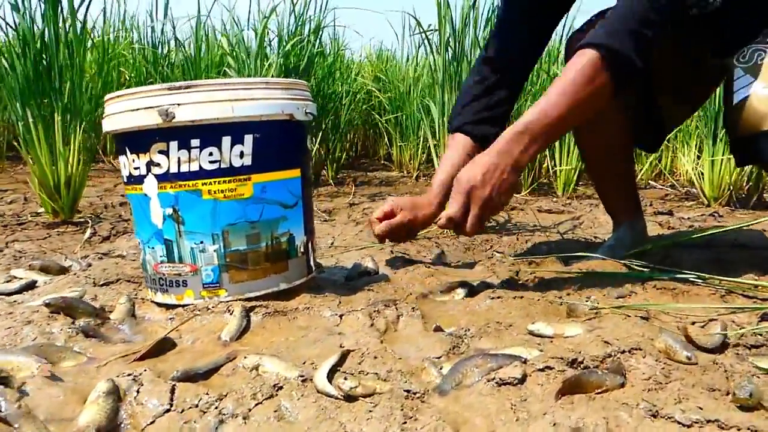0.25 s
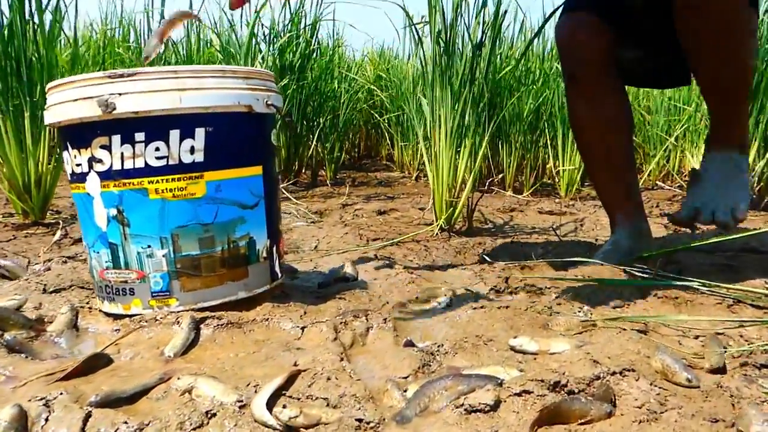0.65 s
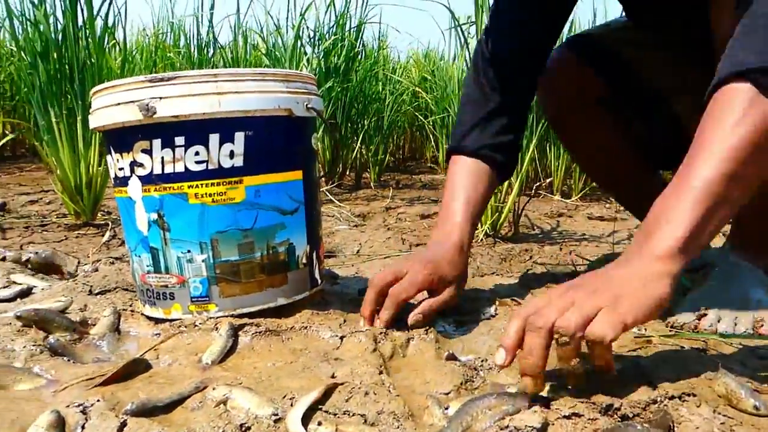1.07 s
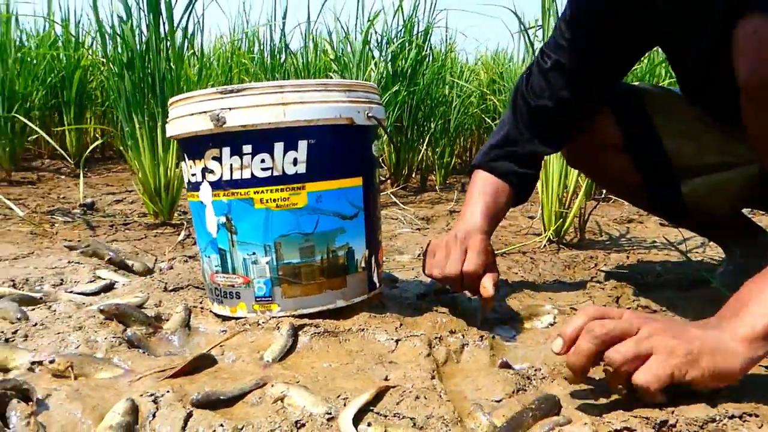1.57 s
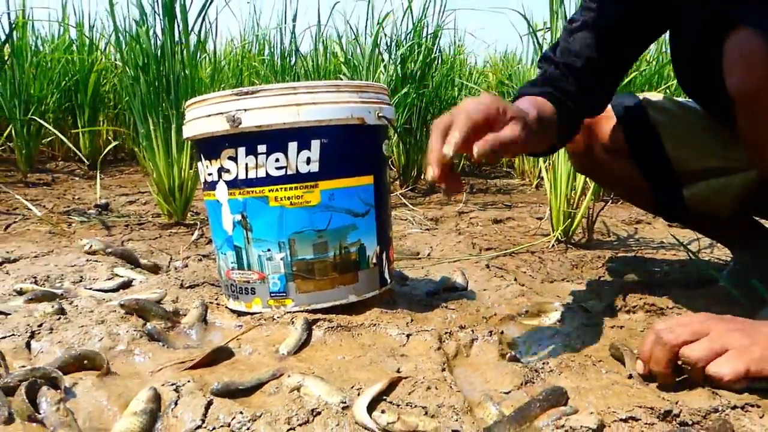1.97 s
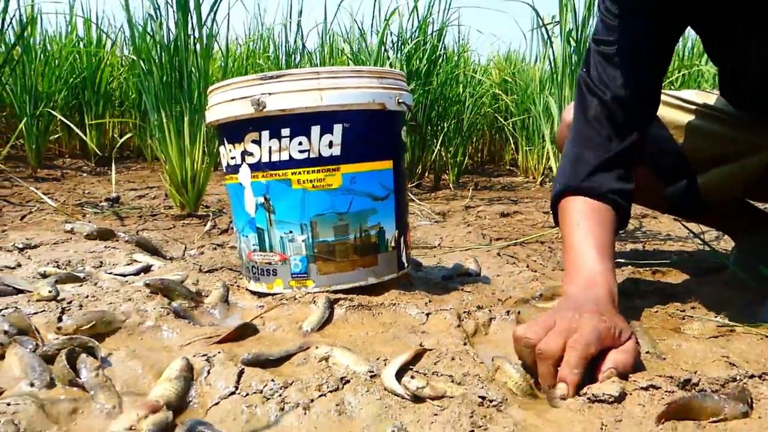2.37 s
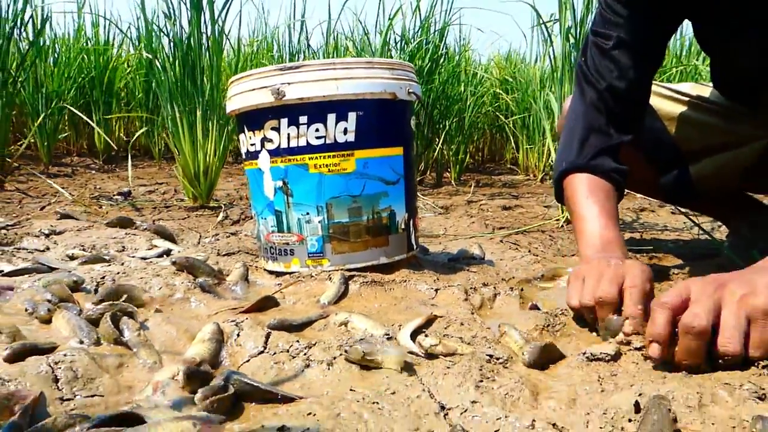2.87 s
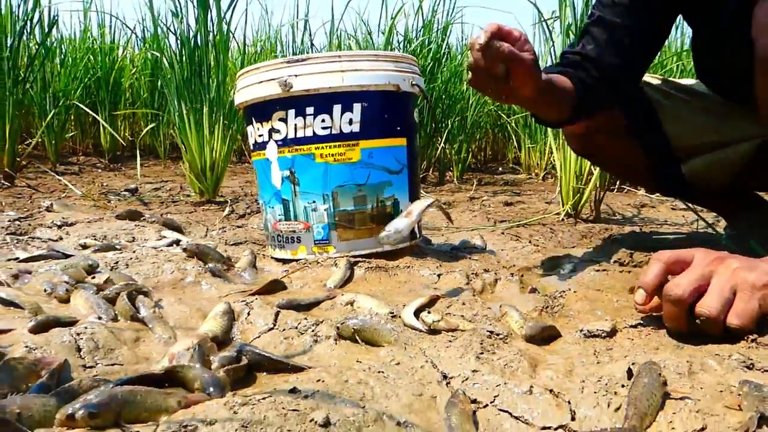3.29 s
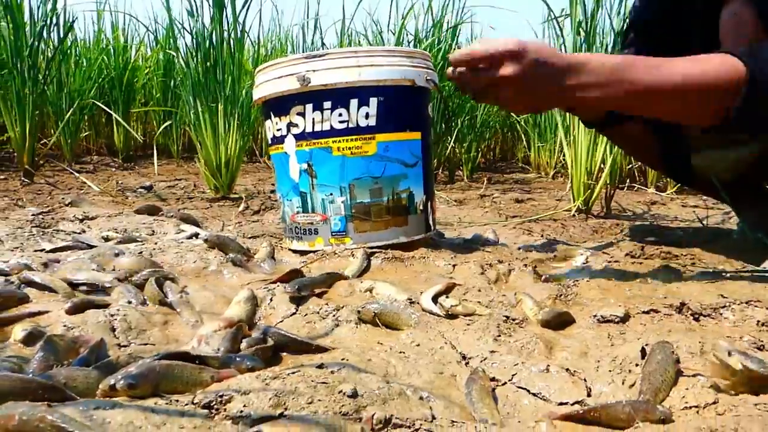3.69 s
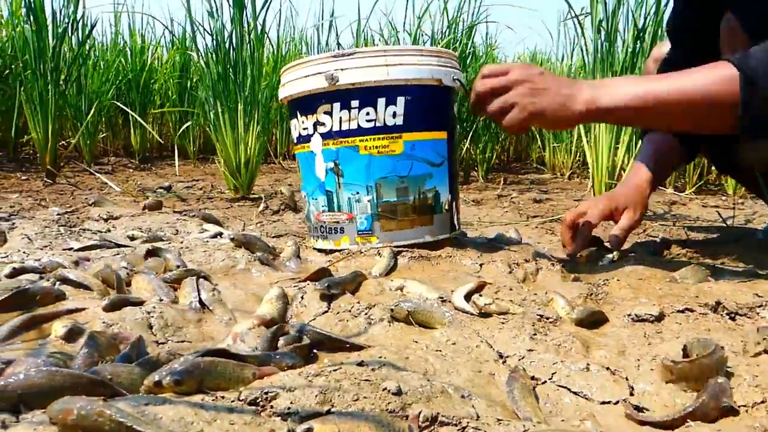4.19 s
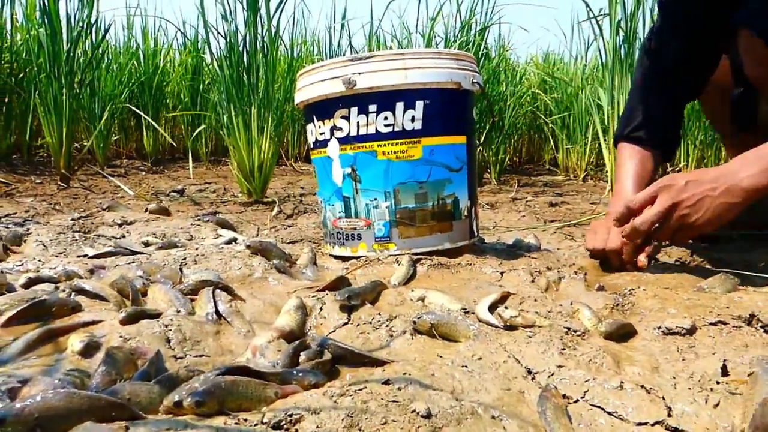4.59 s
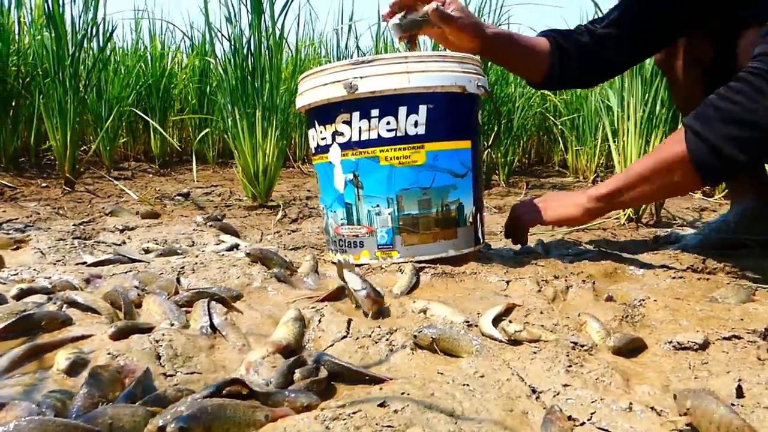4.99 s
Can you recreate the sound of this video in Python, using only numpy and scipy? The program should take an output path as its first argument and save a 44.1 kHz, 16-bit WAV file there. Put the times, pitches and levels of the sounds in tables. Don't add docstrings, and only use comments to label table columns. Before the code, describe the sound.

Dull hollow knocks on a plastic pail, irregular, mixed with sticky pops, spitting smacks and dead thuds on soft mud. It begins sparsely with ticks, bursts into a splashy flurry, calms, then knocks again. Two tiny high squeaks of slimy skin precede one heavy blow, followed by further thumps and a last wet squelching cluster. The sound is dry, close and stereo in open air, with soft leaf hush and a barely audible insect.

```python
import sys
import numpy as np
from scipy import signal
from scipy.io import wavfile
from scipy.ndimage import uniform_filter1d

SR = 44100
rng = np.random.default_rng(int(sys.argv[2]) if len(sys.argv) > 2 else 0)


def transcribe(signal):
    frames = np.atleast_2d(signal).T
    limited = np.clip(frames, -1, 1)
    pcm = np.round(limited * 32767).astype(np.int16)
    wavfile.write(sys.argv[1], SR, pcm)


def natural_amplitude(level_db):
    exponent = np.asarray(level_db, float) / 20
    return 10 ** exponent


N = 231294


def evened(x):
    return x / np.sqrt(np.mean(x ** 2) + 1e-20)


def read(points, hz):
    f, value = np.transpose(points)
    return np.interp(np.log(hz + 1), np.log(f + 1), value)


def add(mix, s, sound, pan_db):
    part = mix[:, max(round(s * SR), 0):][:, :sound.shape[-1]]
    part += natural_amplitude([[pan_db / 2], [-pan_db / 2]]) * sound[..., :part.shape[1]]


def band(x, lo_hz, hi_hz):
    edges = np.clip([lo_hz, hi_hz], 20, [0.4 * SR, 0.45 * SR])
    sos = signal.butter(2, edges, "bandpass", fs=SR, output="sos")
    return evened(signal.sosfilt(sos, x))


def swell(t, rise, fall, bend=0.96, soft=2):
    up = np.sin(np.pi / 2 * np.clip(t / rise, 0, 1)) ** soft
    return up * natural_amplitude(-7 * (np.maximum(t - rise, 0) / fall) ** bend)


def ground(x, t60, db, shared):
    t = np.arange(3000) / SR
    sparse = rng.random((2, len(t))) < 0.05
    taps = rng.standard_normal((2, len(t))) * sparse * natural_amplitude(-60 * t / t60) * (t > 0.001)
    taps = taps + shared * taps[::-1]
    return x + natural_amplitude(db) * signal.fftconvolve(x, taps / np.linalg.norm(taps[0]), axes=1)[:, :N]


# f/Hz, level/dB (per Hz)
HUSH = [(25, -26.5), (110, -6.5), (335, 0), (754, -7), (1890, -9), (8000, -20), (14500, -22.5),
        (16000, -44)]
# f/Hz, likeness (0 to 1)
SAME = [(60, 0.038), (400, 0.088), (2400, 0.63), (15000, 0.64)]


def hush():
    frames, hz = N // 256 + 5, np.fft.rfftfreq(1024, 1 / SR)
    a, b, c, d, patches = rng.standard_normal((frames, 513, 5)).T
    patches = uniform_filter1d(patches, size=20, axis=0)
    patches = evened(uniform_filter1d(patches, size=6, axis=1))
    flicker = uniform_filter1d(rng.standard_normal(N), size=500)
    flicker = evened(uniform_filter1d(flicker, size=300))
    same, left = np.clip(read(SAME, hz), 0, 1)[:, None], a + 1j * b
    right = same * left + np.sqrt(1 - same ** 2) * (c + 1j * d)
    z = np.array([left, right]) * natural_amplitude(read(HUSH, hz)[:, None] + 2.93 * patches)
    air = signal.istft(z, nperseg=1024, noverlap=768)[1][:, :N]
    return natural_amplitude(-47.5) * evened(air * natural_amplitude(2.0 * flicker))


# t/s, length/s
RASPS = [
    (0.547, 0.178),
    (1.399, 0.26),
]


def insect():
    out = np.zeros((2, N))
    for s, length in RASPS:
        rasp = band(rng.standard_normal(SR)[:round(length * SR)], 2880, 3000)
        add(out, s, natural_amplitude(-55.5) * rasp * np.hanning(len(rasp)) ** 0.45, 1.5)
    return out


def grains(lo_hz, hi_hz, per_s, spread_db, cycles, tilt, pan_db, count):
    clumps = evened(uniform_filter1d(rng.standard_normal(N), size=400))
    clumps = natural_amplitude(spread_db * np.minimum(clumps, 1.6))
    size = natural_amplitude(spread_db * np.minimum(rng.exponential(1, N), 2.4))
    size = size * (rng.random(N) < per_s / SR) * clumps
    kind, out = rng.integers(0, count, N), np.zeros((2, N))
    for k, hz in enumerate(np.geomspace(lo_hz, hi_hz, count)):
        u = np.arange(1500) * hz / SR
        ring = np.sin(2 * np.pi * u) * u ** 2 * np.exp(-u / cycles)
        ring = ring / np.linalg.norm(ring) * hz ** -tilt
        add(out, 0, signal.oaconvolve(size * (kind == k), ring), pan_db * rng.standard_normal())
    return evened(out)


# t/s, level/dB
BUSY = [(0, -56.5), (.5, -56.5), (.7, -70), (.95, -41.5), (1.15, -53.5), (1.35, -61), (2.3, -47.5),
        (2.8, -56), (3.3, -44.5), (3.5, -56), (3.9, -55.5), (4.4, -47.5), (4.65, -56.5), (5.24, -54.5)]
# t/s, level/dB
SLOSH = [(0, -60.5), (.73, -72), (.76, -43), (.83, -47), (.89, -48), (.93, -54), (1.03, -54), (1.1, -59.5),
         (3.6, -56.5), (3.68, -56.5), (3.8, -64), (5.24, -69)]


def stirring():
    t = np.arange(N) / SR
    busy_db = np.interp(t, *np.transpose(BUSY))
    slosh_db = np.interp(t, *np.transpose(SLOSH))
    crackle_db = -51 + 0.38 * (busy_db + 55.5)
    crackle = natural_amplitude(crackle_db) * grains(1000.0, 7040, 1500, 4.36, 0.8, 0.2, 13.8, count=20)
    low = natural_amplitude(busy_db + 1.0) * grains(201.4, 688.0, 330, 1.73, 1.03, 0.16, 11.4, count=10)
    slosh = natural_amplitude(slosh_db) * grains(3650, 14400, 7000, 3.6, 0.54, 0.16, 10.0, count=12)
    fizz = natural_amplitude(-62.5) * grains(4300, 14000, 700, 5.1, 0.41, 0.06, 8.2, count=8)
    return crackle + low + slosh + fizz


# t/s (of peak), level/dB, f/Hz, fall/ms (to lose 7 dB)
MUD_THUDS = [(.9, -30, 300, 8), (.928, -32, 300, 5), (1.99, -33, 110, 14), (2.128, -36, 300, 6),
             (2.381, -32, 300, 7), (2.539, -35, 560, 6), (2.633, -34, 300, 9), (2.844, -32, 345, 6),
             (2.973, -33, 290, 3), (2.9905, -17, 540, 2), (3.006, -32, 370, 3), (3.09, -32, 250, 6),
             (4.155, -32, 345, 6), (4.206, -35, 190, 8), (4.429, -33, 430, 7), (5.007, -33, 345, 6),
             (5.204, -33, 330, 8)]
# t/s (of peak), level/dB, f/Hz (of the air pocket)
MUD_POPS = [(.009, -30, 960), (.303, -33, 2400), (.3167, -23, 2750), (.82, -33, 5200), (.846, -30, 5370),
            (.852, -33, 4900), (.901, -28, 1930), (.965, -29, 2070), (.976, -29, 780), (.989, -33, 4100),
            (1.021, -32, 4200), (1.308, -31, 3720), (1.83, -29, 1790), (1.89, -30, 4410),
            (1.956, -32, 2620), (1.985, -28, 4270), (2.347, -31, 1930), (2.537, -31, 1930),
            (2.712, -30, 2070), (2.729, -26, 3860), (2.924, -32, 1930), (2.957, -27, 3860),
            (3.051, -27, 9100), (3.106, -30, 1930), (3.24, -21, 1240), (3.366, -25, 3170),
            (3.367, -26, 4000), (3.39, -28, 4550), (3.6, -31, 1200), (3.675, -30, 2340), (3.961, -31, 1515),
            (4.152, -31, 1550), (4.189, -31, 950), (4.432, -32, 1600), (4.549, -31, 2500),
            (4.737, -31, 1930), (4.737, -32, 1300), (4.751, -31, 1790), (5.1325, -24, 4200),
            (5.139, -26, 13500), (5.1655, -27, 3100)]


def mud():
    out, dead_db = np.zeros((2, N)), -22
    for row in MUD_THUDS:
        add(out, *knock(*row, dead_db, dead_db, rng.standard_normal(2200)), 1.0)
    for row in MUD_POPS:
        burst = smack(*row, 1.0, -18, rng.standard_normal((1400, 4)))
        add(out, *burst, 3.0 * rng.standard_normal())
    return ground(out, 0.025, -12, 0.3)


def squeak(rows):
    s, db, hz, build_ms = np.transpose(rows)
    t = np.arange(s[0] - build_ms[0] / 1000, s[-1] + 0.0061, 1 / SR)
    late_ms = 1000 * (t[:, None] - s)
    let_go_ms, depth_db = 2.38, 16
    slips_db = db - depth_db * np.maximum(-late_ms / build_ms, late_ms / let_go_ms)
    level_db, now = slips_db.max(axis=1), slips_db.argmax(axis=1)
    pitch = hz[now] * (1 - 0.04 * np.clip(late_ms[np.arange(len(t)), now], -3, 3))
    noise = rng.standard_normal(SR)[:len(t)]
    waver = 1 + 0.053 * evened(uniform_filter1d(noise, size=24))
    phase = 2 * np.pi * np.cumsum(pitch * waver) / SR
    tone = np.sin(phase) + 0.024 * np.sin(2 * phase) + 0.082 * np.sin(3 * phase)
    return t[0], natural_amplitude(level_db) * (tone + 0.13 * band(noise, 1000, 4600))


# t/s, level/dB, f/Hz, build-up/ms
SQUEAKS = [
    [(3.2195, -17.5, 2971, 1.1), (3.2233, -16, 2900, 1.6), (3.226, -24, 2910, 1.6), (3.231, -20, 3000, 3),
     (3.2325, -21, 2800, 1.5), (3.2363, -10.5, 3050, 1.02), (3.24, -17.5, 3140, 1.2),
     (3.2415, -23, 3000, 1.2)],
    [(3.413, -22, 3380, 0.77), (3.4156, -17.5, 3190, 1.1), (3.4175, -25, 3100, 2), (3.4205, -22, 3300, 3),
     (3.423, -21.5, 3150, 2.5), (3.4252, -20, 3300, 3), (3.428, -17, 3250, 4), (3.43, -22, 3100, 2),
     (3.4415, -28.5, 3305, 3.96)],
]


def squeaks():
    out = np.zeros((2, N))
    for rows in SQUEAKS:
        add(out, *squeak(rows), -3.0)
    return out


def smack(s, db, hz, fall_ms, spray_db, noise):
    t = np.arange(noise.shape[0]) / SR - 0.005
    fall = 0.93 * fall_ms / 1000
    rise = 0.0003 + 0.6 * fall
    clean = np.clip(1.2 - 0.451 * fall_ms, 0.15, 0.75)
    ring = np.sin(2 * np.pi * hz * t * (0.95 + 15 * t))
    pocket = clean * ring + 0.71 * (1 - clean) * band(noise[:, 0], 0.61 * hz, 1.41 * hz)
    drops = noise[:, 1] + 0.68 * noise[:, 2:].T
    spray = natural_amplitude(spray_db - 4.5) * band(drops, 3040, 12300) * swell(t + 0.0024, rise + 0.002, fall)
    snap = natural_amplitude(-10) * band(drops, 0.35 * hz, 1.7 * hz) * swell(t, rise, 0.00057)
    seep = 0.11 * min(fall_ms / 1.6, 1) ** 2 * swell(t + 0.0063, 0.005, 0.0091)
    burst = (swell(t, rise, fall) + seep) * pocket
    return s - rise - 0.005, natural_amplitude(db) * (burst + spray + snap)


# t/s, level/dB, f/Hz, left-right/dB
POPS = [(0.3163, -21, 2040, -4), (0.7796, -19.5, 910, 6), (0.7805, -25, 1510, 6), (0.799, -31, 3570, 7),
        (0.8622, -19.5, 1180, 1), (0.901, -31.5, 4300, 1.5), (1.2007, -31.5, 4010, 5),
        (1.8958, -27, 1668, 2.5), (2.229, -35, 4176, 3.5), (2.3052, -32, 1610, 3), (2.573, -20.5, 1730, -2),
        (2.6024, -24.5, 4490, -1.5), (2.8285, -30, 2230, 7.5), (2.894, -33.5, 1910, -7),
        (2.951, -31.5, 1920, 2.5), (2.9878, -28.5, 1657, 1.6), (3.09, -31.5, 1456, 1),
        (3.3659, -25, 7140, 1.5), (3.39, -34, 2013, -3), (3.8797, -34, 2180, 5.5), (4.1155, -10, 690, 1),
        (4.1178, -28, 1550, 1), (4.2595, -32, 1580, 3.5), (4.549, -31, 4000, 3), (4.6768, -30.5, 2600, -4),
        (5.0118, -32, 1900, 3), (5.1716, -22, 1210, 5)]
# t/s, level/dB, f/Hz, spray/dB, left-right/dB
SPLATS = [(0.2974, -28.5, 9410, -14, -4), (0.392, -35.5, 4680, -5, 2.5), (0.9485, -31, 1260, -1, -5),
          (1.6695, -29, 4130, -11.5, 4), (1.7351, -33, 1680, -1, -2), (1.889, -28.5, 1724, -10, 1),
          (1.9819, -30, 9800, 7.5, -2), (1.9873, -26, 1330, -4, 4.5), (2.163, -31.5, 3800, -10, 1.35),
          (2.537, -29, 4630, -4.5, -3), (2.639, -23, 4460, -5, -1.5), (2.7241, -27, 2190, -1.5, 0),
          (2.7294, -27.5, 2210, -4, -3), (2.8773, -28.5, 9630, -2.5, -4), (3.0507, -22.5, 7070, -7, -3),
          (3.181, -30.5, 5590, -10.5, 1.34), (3.1964, -27.5, 1466, -8, -5), (3.378, -27, 4090, -13, 1),
          (3.434, -24, 3300, -13, -1), (3.4338, -26.5, 1600, -12, -2), (3.5548, -33, 5520, 1, 2),
          (4.802, -33, 3940, -7, 0.5), (5.0386, -27.5, 2560, -11, -6), (5.133, -27, 1800, -4, -0.34)]
# t/s, level/dB, f/Hz, fall/ms (to lose 7 dB), spray/dB
SQUELCHES = [(0.7858, -33, 1697, 7, -9), (0.8098, -36, 1207, 7, -9), (0.945, -37, 4330, 3, -6),
             (0.9744, -30, 1192, 4, -21), (1.8536, -33, 1710, 4, -15.5), (2.773, -34.5, 4250, 3.5, -2.5),
             (2.955, -32, 3860, 4, -11.5), (3.4394, -29.5, 11000, 3.5, -5), (3.684, -41.5, 13773, 7, 2),
             (3.826, -38, 6100, 3.5, -7), (4.1024, -31, 1530, 12, -3.5), (4.5191, -33, 2284, 3, -10),
             (5.1363, -20, 2130, 4, -10.5), (5.15, -26.5, 1250, 5.5, -27.5), (5.1616, -23, 1216, 3, -13),
             (5.1652, -27, 2000, 6, -19)]
# t/s, level/dB, f/Hz
TICKS = [(0.2773, -40, 3640), (0.499, -25.5, 1590), (0.533, -32.5, 1555), (1.237, -28.5, 3070),
         (1.26, -30.5, 1667), (1.3606, -30.5, 3200), (1.6484, -33, 3970), (2.1277, -28, 1790),
         (2.333, -28, 1800), (2.475, -27.5, 2360), (2.6186, -28, 3740), (2.7087, -35, 4520),
         (.012, -27.5, 1800), (.095, -36, 1600), (.115, -33, 1900), (.178, -32, 1900), (.44, -33, 1900),
         (.588, -31.5, 1500), (.882, -29, 2600), (1.472, -34, 1150), (1.487, -32, 1200), (1.51, -35, 1200),
         (1.532, -31, 750), (1.562, -30.5, 1900), (1.568, -34, 2100), (1.651, -32, 1900),
         (1.744, -32, 1600), (2.29, -25, 890), (4.387, -26, 840), (4.7515, -26.5, 740), (4.275, -33, 1650),
         (4.312, -34, 1500), (4.388, -29, 1650), (5.075, -37, 3180), (5.108, -32, 2420),
         (5.2095, -32, 1964)]
# t/s, level/dB, f/Hz
SPECKS = [(0.1744, -40, 4600), (0.427, -35, 5300), (0.4442, -34, 9180), (0.464, -32.5, 5530),
          (0.5821, -36, 4080), (0.6, -32, 3730), (0.6594, -42, 4250), (0.7377, -39, 7100),
          (0.7572, -36, 5610), (0.8686, -32, 9850), (1.1373, -31.5, 7300), (1.7199, -34, 3900),
          (2.0203, -30, 6800), (2.1425, -30.5, 3980), (2.464, -31, 5000), (2.7602, -26, 4360),
          (2.9123, -37, 8600), (3.0041, -30, 3500), (3.476, -35, 5610), (4.0472, -32, 4040),
          (4.3997, -31.5, 9000), (4.4218, -31, 5880), (4.6029, -38, 10100), (5.0962, -34, 5330),
          (5.1047, -34, 3790), (5.1387, -21, 4460), (5.16, -31, 9000), (5.1714, -33, 4450),
          (5.1826, -33, 5330), (5.1954, -35, 5010)]


def smacks():
    rows = [(s, db + 2.0, hz, 1.1, -19.5, pan_db) for s, db, hz, pan_db in POPS]
    for s, db, hz, spray_db, pan_db in SPLATS:
        fall_ms = 0.76 if hz > 6200 else 2.066
        rows.append((s, db, hz, fall_ms, spray_db, pan_db))
    rows += [(*row, 0.7) for row in SQUELCHES]
    rows += [(s + 0.00101, db - 2.0, hz, 1.2, -19, 2.2) for s, db, hz in TICKS]
    rows += [(s + 0.001, db - 2.5, hz, 0.7, -9, 0.6) for s, db, hz in SPECKS]
    out = np.zeros((2, N))
    for row in rows:
        add(out, *smack(*row[:-1], rng.standard_normal((1400, 4))), row[-1])
    return out


def knock(s, db, hz, fall_ms, bottom_db, rim_db, noise):
    t = np.arange(len(noise)) / SR
    rise, fall = 0.004, 0.9 * fall_ms / 1000
    ripple = 0.0023 * np.clip((db + 38) / 24, 0.2, 1) * (1 - np.exp(-t / 0.0012))
    wall = np.sin(2 * np.pi * hz * (t * (1 - 2.6 * t) + ripple)) * swell(t, rise, fall, 1.43, 1.4)
    bottom = natural_amplitude(bottom_db - 3.0) * np.sin(2 * np.pi * 178 * t) * swell(t, 0.0064, 0.0087)
    belly = natural_amplitude(min(bottom_db, -9) - 0.5) * np.sin(2 * np.pi * 212 * t) * swell(t, 0.0085, 0.007, 1.4)
    direct = np.clip(0.86 + rim_db / 8.3, 0, 1)
    turns = 578 * (t + 0.00086 * (1 - np.exp(-t / 0.0011)))
    rim = natural_amplitude(rim_db - 2.5) * np.sin(2 * np.pi * turns)
    rim = rim * swell(t, 0.0018, 0.0025 + direct * 0.95 * fall, 1.15)
    slap = natural_amplitude(np.clip(rim_db, -14, 1) - 15) * band(noise, 460, 1586) * swell(t, 0.0024, 0.0028)
    push = natural_amplitude([[-39], [-49]]) * swell(t, 0.0027, 0.0091)
    return s - rise, natural_amplitude(db) * (0.86 * wall + bottom + belly + rim + slap + push)


# t/s (of peak), level/dB, f/Hz, fall/ms, rim/dB
RIM_BLOWS = [(0.7822, -27.5, 334, 0.5, 12.5), (0.789, -30, 441.5, 2.5, 7.5), (0.8102, -28, 322, 3, 8),
             (0.8177, -32, 320, 1, 3), (1.0541, -29.5, 312, 5.5, -2), (1.968, -31, 230, 2, -8),
             (1.9807, -30.5, 400, 5, 0.5), (1.9877, -19, 368, 6, 9.5), (2.0242, -28, 368, 6, 8),
             (2.155, -31.5, 348.3, 5, 0), (2.1667, -30.5, 300, 3, -0.5), (2.3084, -16.5, 340, 4, 0.5),
             (2.357, -32, 306, 5.5, -2), (3.213, -34, 400, 5, -3), (3.241, -28.5, 261, 2.5, -3),
             (4.067, -27, 397, 1, 1.5), (4.0727, -25.5, 402, 2, -3), (4.084, -28, 377, 5, -2),
             (4.1193, 0.5, 323.5, 3, -5), (5.135, -16.5, 330, 1.5, 6.5), (5.14, -22, 282, 8.5, 3),
             (5.1471, -35, 319, 8.5, 8), (5.153, -24.5, 425, 2, 3), (5.1615, -25.5, 352, 4.5, 4.5)]
# t/s (of peak), level/dB, f/Hz, fall/ms
WALL_BLOWS = [(0.856, -23, 315, 14), (0.8668, -11, 331, 4), (0.8837, -34, 307.5, 10),
              (0.9771, -20.5, 392, 4.5), (1.0376, -18.5, 290, 4.5), (1.4842, -31, 349.5, 1.2),
              (1.727, -30, 260.9, 14), (2.2558, -33, 315.5, 8.5), (2.2928, -12.5, 316, 14),
              (2.9945, -17, 350, 2.5), (3.2463, -27.5, 318.4, 2), (3.8061, -23, 300, 4),
              (3.8206, -25.5, 327, 1.5), (4.2613, -12.5, 296, 4.5), (4.2792, -25, 303, 6),
              (4.295, -23.5, 369, 1), (4.315, -19.5, 370, 2.5), (4.331, -31.5, 330, 6),
              (4.3906, -11.5, 292, 3), (4.5057, -31.5, 330, 9), (4.515, -27.5, 313.8, 10),
              (4.727, -29, 300.7, 11.5), (4.755, -10, 283, 6), (5.1752, -25.5, 340, 5.5),
              (5.1938, -22, 352, 2)]
# t/s (of peak), level/dB, f/Hz, fall/ms, bottom/dB
LANDINGS = [(1.0243, -28, 308, 26, -13), (1.4897, -30.5, 327.7, 9, -3), (1.515, -23, 300, 4.5, -10),
            (1.5214, -30.5, 333.7, 1, -1), (1.5268, -36, 327, 2.5, 0.5), (1.5813, -31, 302.6, 5, -5),
            (1.8793, -29, 303, 3, -2), (1.8862, -36, 340, 9, 6), (2.7783, -31.5, 384, 7.5, -6),
            (2.8145, -30, 330.3, 1.5, -1), (2.8209, -39.5, 298, 17, 8), (3.0919, -32.5, 274, 6.5, -5.5),
            (3.2977, -32, 300, 4, -9), (4.0909, -24, 234, 9.5, 1), (4.1022, -12, 410, 0.5, -5),
            (4.1093, -14.5, 248, 8.5, -10), (4.2716, -25.5, 270, 3, -7), (4.3024, -25.5, 329, 1, -9),
            (4.401, -25, 286, 1, -9), (4.523, -26, 285, 7.5, -6), (4.7353, -27, 311, 0.5, -7),
            (4.773, -27.5, 292, 1, 1.5), (4.9516, -20, 270, 6, -5), (4.96, -27.5, 282.7, 8, 2.5)]
# t/s, level/dB, f/Hz
NUDGES = [(0.999, -27.5, 303), (1.102, -30.5, 301.5), (1.852, -31, 323.5), (1.918, -35, 559),
          (2.426, -28.5, 350), (2.533, -33, 335), (3.131, -31, 336), (3.155, -28.5, 316),
          (3.338, -33.5, 305), (1.463, -34, 300), (1.549, -36, 270), (1.711, -31.5, 271), (1.742, -35, 300),
          (4.345, -31, 392), (4.79, -28.5, 390), (4.844, -32.5, 260), (4.912, -32, 406), (4.924, -34, 380)]


def knocks():
    rows = [(s, db, hz, ms, -16.5, rim_db) for s, db, hz, ms, rim_db in RIM_BLOWS]
    rows += [(s, db, hz, ms, -16.5, -14.5 - 0.36 * (db + 22)) for s, db, hz, ms in WALL_BLOWS]
    rows += [(*row, -16) for row in LANDINGS]
    rows += [(s + 0.0049, db - 4.0, hz, 6.5, -12, -11) for s, db, hz in NUDGES]
    out = np.zeros((2, N))
    for row in rows:
        add(out, *knock(*row, rng.standard_normal(2200)), 1.9 + 2.7 * rng.standard_normal())
    return out


def scene():
    background = hush() + insect() + stirring()
    wet = ground(squeaks() + smacks(), 0.0275, -11.5, 0.2)
    bucket = ground(knocks(), 0.038, -10, 0.62)
    return background + mud() + wet + bucket


def band_limit(x):
    return signal.sosfilt(signal.butter(12, 16670, fs=SR, output="sos"), x)


def record(dry):
    dip = signal.iirnotch(7520, 45, SR)
    heard = dry + 0.42 * (signal.lfilter(*dip, dry) - dry)
    power = uniform_filter1d((dry ** 2).mean(0), size=400)
    power_db = 10 * np.log10(abs(power) + 1e-12)
    back_db = np.arange(N) * 58 / SR
    held_db = np.maximum.accumulate(power_db + back_db) - back_db
    over_db = np.maximum(held_db + 18.5, 0)
    heard = heard / natural_amplitude(0.34 * signal.lfilter([0.002], [1, -0.998], over_db))
    limited = 1.5 * np.tanh(heard / 1.45)
    top_edge = signal.firwin(511, 15900, window=("kaiser", 9), fs=SR)[None]
    return band_limit(signal.oaconvolve(limited, top_edge, "same"))


dry = scene()
out = record(dry)
transcribe(out)
```